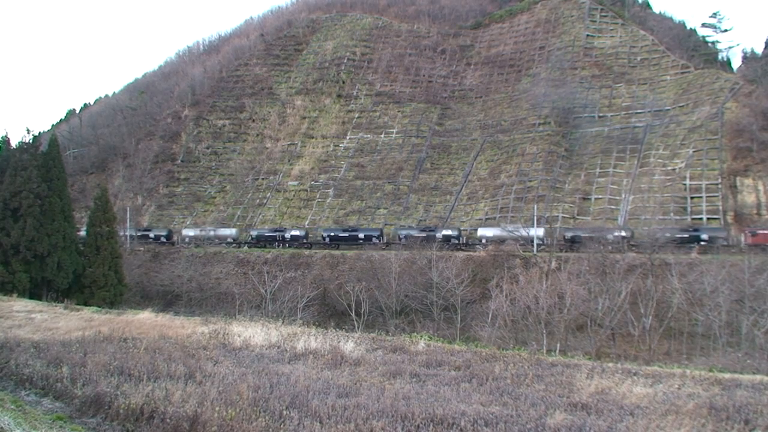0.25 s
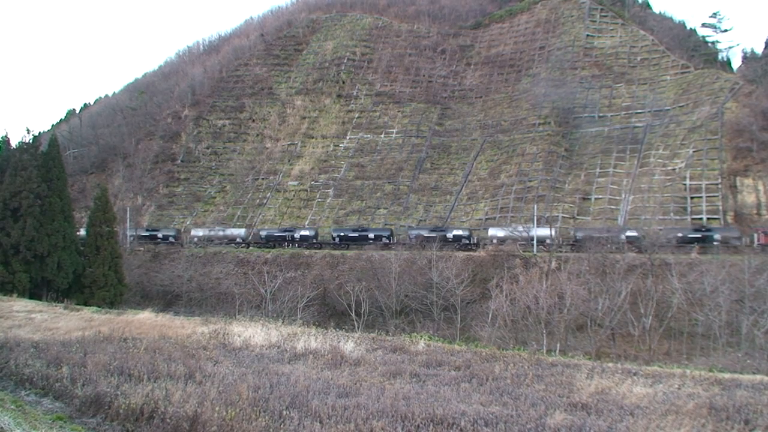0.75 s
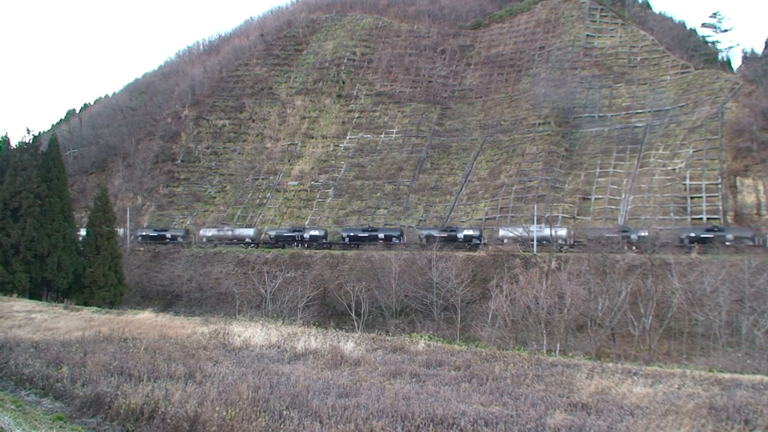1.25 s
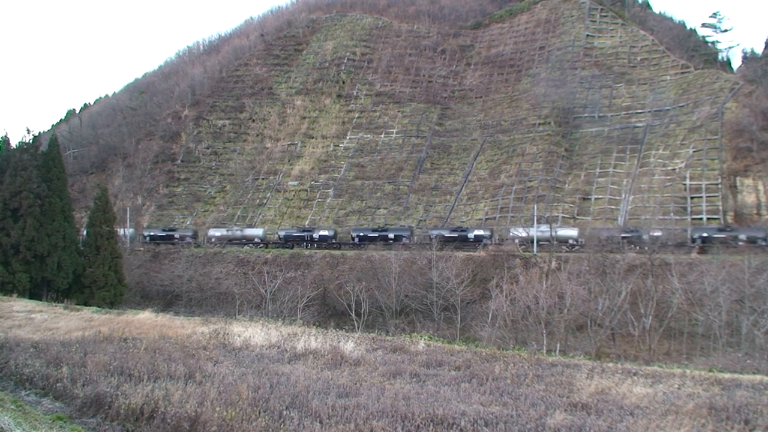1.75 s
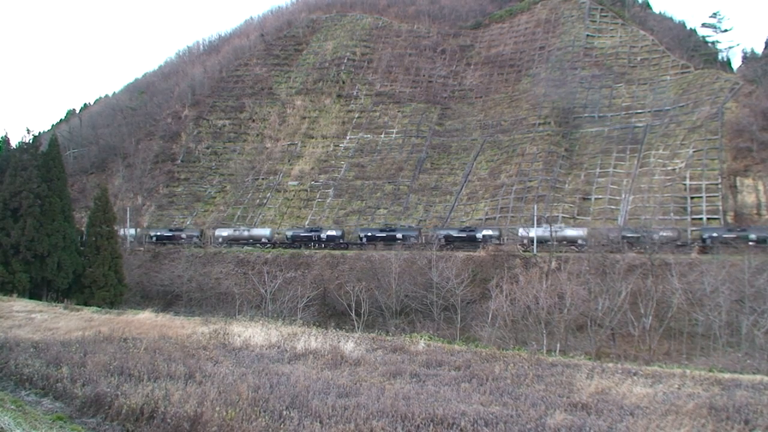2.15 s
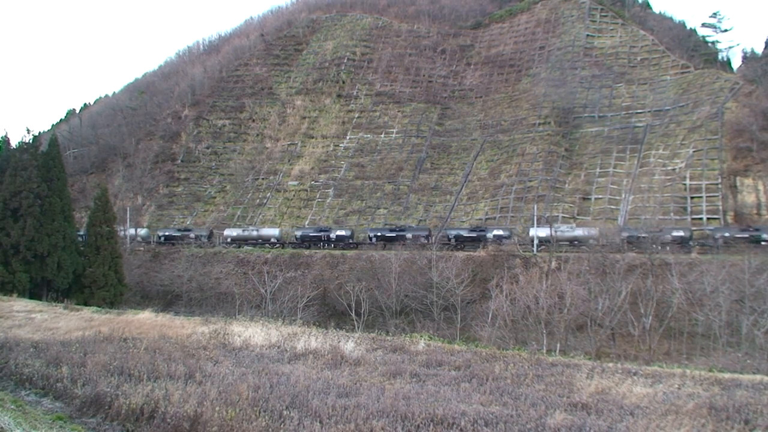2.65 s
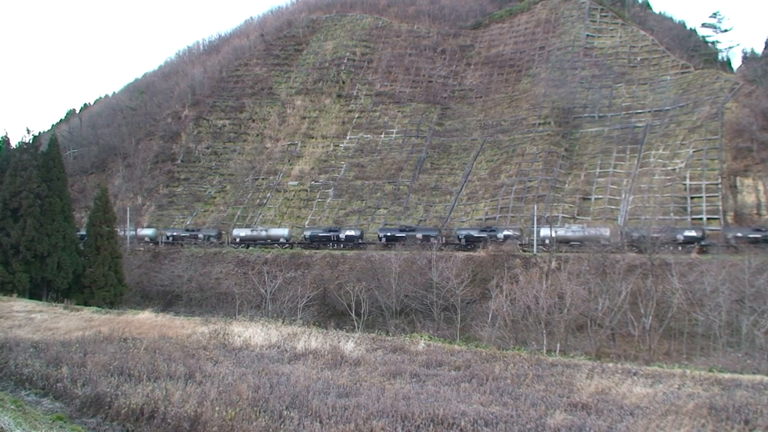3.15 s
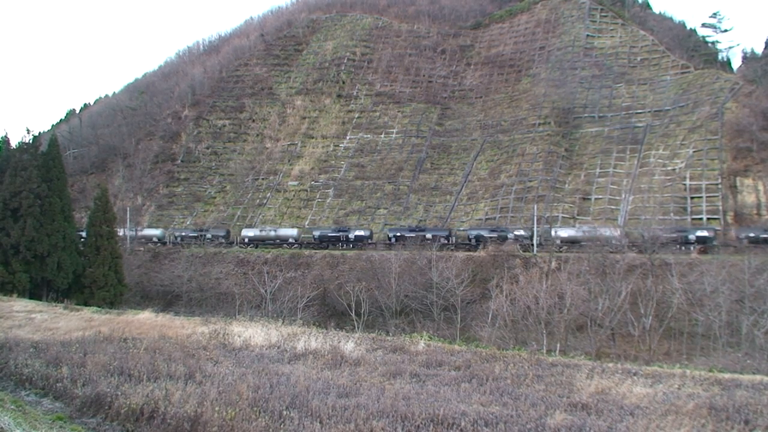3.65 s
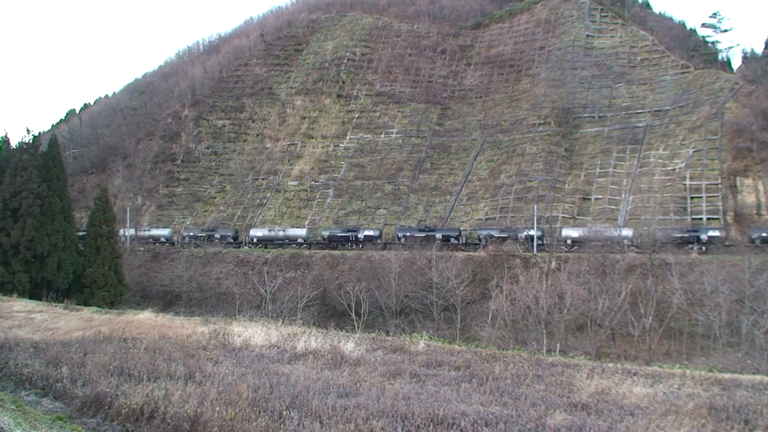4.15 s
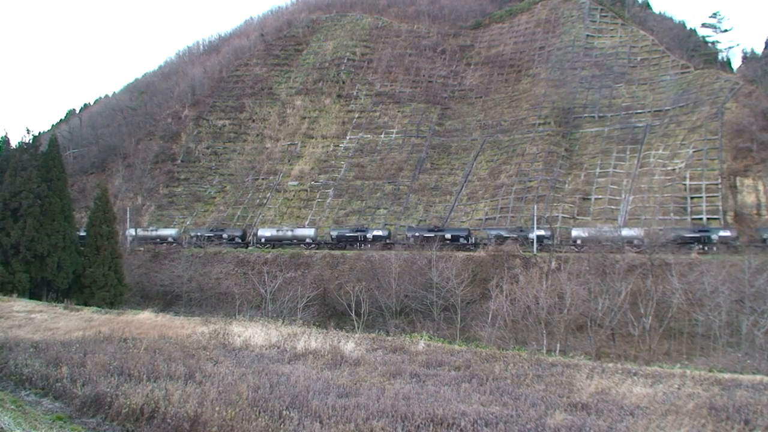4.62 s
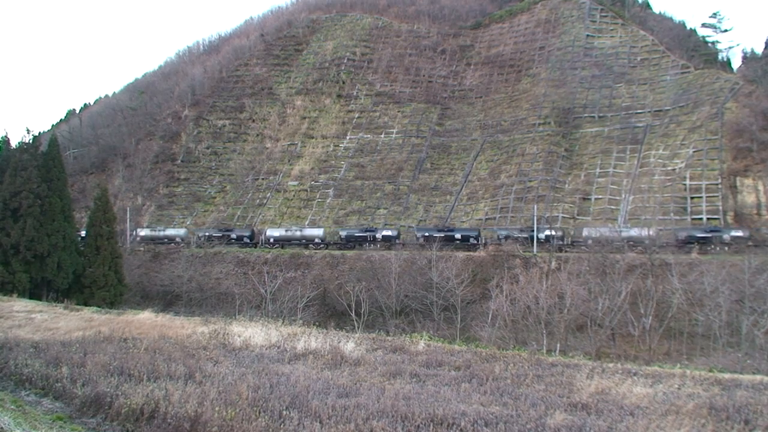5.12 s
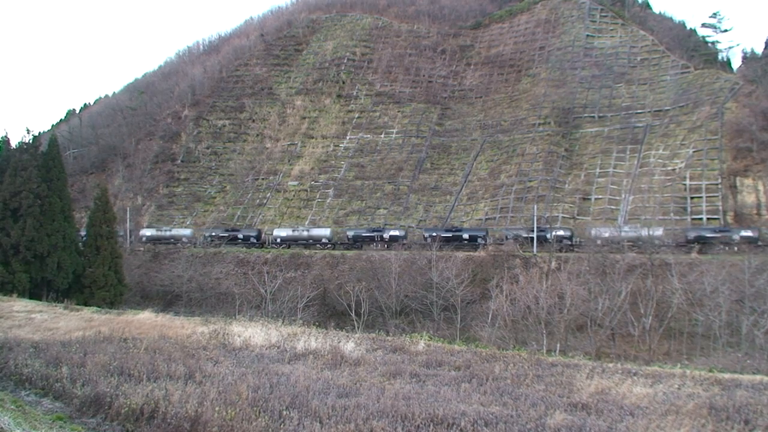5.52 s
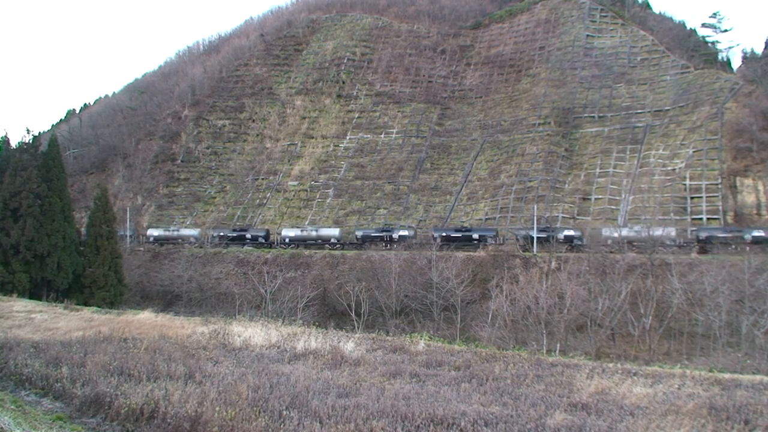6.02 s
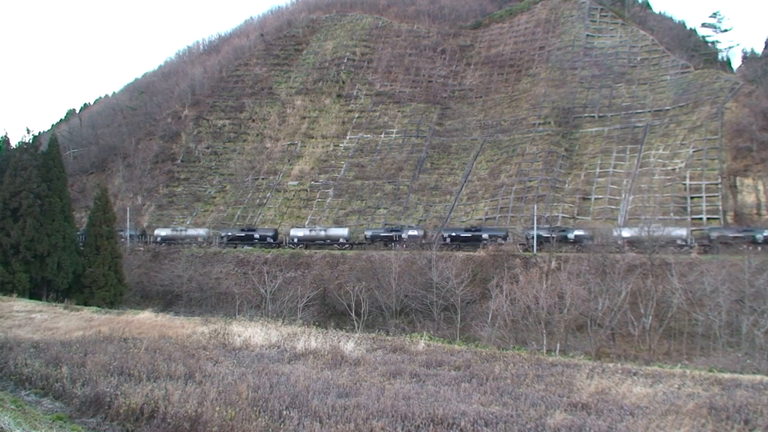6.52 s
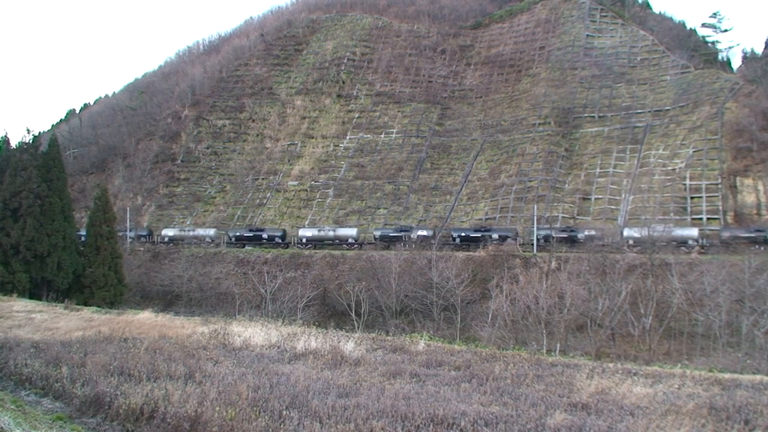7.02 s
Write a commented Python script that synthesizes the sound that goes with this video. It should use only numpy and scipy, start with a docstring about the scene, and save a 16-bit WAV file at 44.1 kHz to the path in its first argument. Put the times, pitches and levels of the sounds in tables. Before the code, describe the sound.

A slow goods train grinds along outdoors, its wheels shrieking in two long rough bursts before settling into pulsing, clattering rolling noise.

```python
"""Freight train with a squealing flange

A slow train crosses a valley. Twice a wheel flange binds hard: shaped noise scrapes, the rail sings, and the
wheel rings in filtered noise and squeals in wavering sines that ring out. Between and after, it only grazes.
Wagons grind and rumble along in coloured noise, a diesel's knock throbbing in the same band, with hard knocks,
dull thumps, low hums and a thin whine. The hillside answers the scraping with a decaying noise tail."""
import sys
import numpy as np
from scipy import signal
from scipy.fft import rfft, irfft, next_fast_len
from scipy.io import wavfile
from scipy.ndimage import uniform_filter1d, map_coordinates

SR = 44100
rng = np.random.default_rng(int(sys.argv[2]) if len(sys.argv) > 2 else 0)


def invert_db(level):
    """Linear amplitude ratio for a level in decibels (20 dB per decade), elementwise."""
    return 10 ** (np.asarray(level, dtype=float) / 20)


def dump(signal):
    """Clip the signal to [-1, 1] and save it as 16-bit WAV at the path in sys.argv[1]."""
    limited = np.clip(np.atleast_2d(signal).T, -1, 1)
    pcm = np.round(limited * 32767).astype(np.int16)
    wavfile.write(sys.argv[1], SR, pcm)


N = 321048

# Flange binding, one table a contact. Each row: time in seconds, scrape and treble levels in dB before trims.
CONTACTS = [
    [(0.0, -21, -29), (0.12, -21.5, -26), (0.23, -23.5, -28.5), (0.39, -21, -22), (0.45, -21.5, -27.5),
     (0.7, -21, -28), (0.87, -22.5, -30), (1.0, -22, -30.5), (1.1, -20, -29), (1.2, -23.5, -30.5),
     (1.378, -21, -31.5), (1.395, -27, -29)],
    [(1.665, -40, -56), (1.701, -37, -43.5), (1.761, -34, -36), (1.805, -44, -49), (1.83, -34, -46)],
    [(2.12, -40, -67), (2.154, -37, -31), (2.216, -22, -33.5), (2.37, -24, -31), (2.4, -21.5, -30.5),
     (2.712, -22.5, -29), (2.8, -25, -32.5), (3.04, -23.5, -29), (3.176, -19.5, -27.5), (3.256, -25.5, -28),
     (3.468, -19.5, -29.5), (3.492, -28, -35)],
]
# Top band against the treble in dB before trims, one value a contact.
SIZZLE_RE_TREBLE_DB = -13, -7.5, -14
# Noise colours of the scrape, its treble hiss and its top sizzle. Each row: Hz, relative density in dB.
SCRAPE_COLOUR = [(410, -49), (700, -15), (1700, -5), (2150, 5), (2500, -0.5), (3300, -4.5), (3700, -4),
                 (4600, -7.5), (5300, -12.5), (5900, -30), (7000, -39), (9100, -54), (15400, -120)]
HISS_COLOUR = [(2940, -26), (5000, 0), (5360, 6), (5920, -6), (6230, -1), (7230, -0.5), (7840, -9),
               (8530, -10), (9030, -18), (10000, -27), (13000, -37), (22000, -120)]
SIZZLE_COLOUR = [(5000, -26), (8500, -2), (8780, -8), (9520, -5), (10000, -12), (12900, -18), (14600, -30),
                 (15500, -34)]
# The rail's singing band, applied twice. Each row: centre in Hz, width in Hz, relative level in dB.
RAIL_SONG_MODES = [(2064, 73, 4.5), (2204, 63, 3), (2396, 200, -4.5)]
# Flares of the rail's song. Each row: time in seconds, peak in dB before a trim, half length in seconds.
SONG_FLARES = [(.07, -11, 0.029), (.28, -20, .04), (.45, -15, 0.13), (.63, -23, 0.033), (.77, -23, .03),
               (.84, -18, 0.016), (.92, -15, 0.015), (1.27, -21, 0.051), (2.29, -12.5, 0.032),
               (2.4, -19, 0.018), (2.46, -13.5, 0.044), (2.6, -19, .04), (2.71, -10, 0.026),
               (2.98, -12.5, 0.048), (3.05, -30, 0.018), (3.22, -14, 0.024)]
# Modes rung by the scrape, one table a wheel. Each row: Hz, relative level in dB.
WHEEL_MODES = [(2837, -39), (3015, -35), (3316, -41), (3548, -47), (4075, -31), (4355, -47), (4990, -46),
               (5163, -36), (5453, -40), (6164, -47), (6288, -37), (6842, -48), (7004, -49), (7214, -50),
               (7381, -48), (7461, -49), (7795, -53), (7978, -55), (8220, -54), (8506, -49), (9028, -59),
               (9609, -53), (10702, -54), (11020, -66), (11779, -64), (12839, -65), (13544, -65),
               (13878, -70), (14045, -71), (14739, -75)], [(2681, -41), (2885, -41), (3009, -37),
               (4037, -34), (4317, -47), (5125, -29), (5986, -53), (6212, -39), (6584, -54), (6869, -51),
               (7305, -46), (8366, -52), (8759, -62), (9227, -63), (9458, -59), (10013, -70), (10261, -65),
               (10497, -65), (11343, -71), (11574, -71), (12048, -78), (12602, -72), (13060, -79),
               (13184, -77), (13609, -81), (14018, -79), (14562, -83), (14702, -85), (15305, -91)]
# Brief grazes of the flange. Each row: time in seconds, strength in dB, low part and top part in dB against
# that strength (all before trims and onset), t60 of the grit in seconds.
GRAZE_EVENTS = [(1.563, -34, -6, -30, 0.05), (1.6685, -33, 1, -23, 0.071), (1.7374, -32, -10, -22, 0.058),
                (1.812, -32, 9, -11, 0.058), (1.8835, -42, 16, -10, 0.099), (1.96, -34, -8, -11, 0.037),
                (1.9663, -23.5, 8, -16.5, 0.13), (2.08, -29.5, 4, -25, 0.044), (2.128, -23, -11, -27, 0.05),
                (2.15, -22.5, -17, -34, 0.096), (2.1904, -23, 5, -20, 0.044),
                (3.713, -29.5, 6.5, -15, 0.064), (5.335, -41, -4, -24, 0.063), (5.441, -39, 10, -20, 0.063),
                (5.6545, -32, 1, -28, 0.041), (5.8605, -34.5, 11, -21, 0.082), (6.011, -35, -2, -18, 0.056),
                (6.1891, -38.5, 14.5, -18, 0.071), (6.3225, -39.5, -9, -15, 0.058)]
# Noise colour of a graze's treble. Each row: Hz, relative density in dB.
GRAZE_COLOUR = [(4000, 1), (5500, 8), (7000, 2.5), (9000, -9.5), (11000, -30), (15500, -55)]
# Squeal tones, one table a wheel. Each row: Hz, dB against the scrape while bound, dB against a graze's strength.
SQUEALS = [
    [(1126, -19.5, -30), (2837, -21, -30), (3015, -22, -30), (3317, -20.5, -30), (4075, -18.5, -30),
     (4126, -12, -30), (5165, -21, -30), (5454, -29, -30), (6287, -26.5, -30), (8500, -27, -40),
     (9608, -30, -38), (10701, -34, -45), (11779, -41, -51), (12839, -44, -52), (13544, -48, -50),
     (14739, -48, -55)],
    [(2885, -33, -26), (3008, -20, -22), (4037, -14, -34), (4157, -27, -19), (5125, -16.5, -15),
     (6211, -23, -39), (7300, -31, -37), (8366, -35, -44), (9330, -31, -39), (10520, -35, -44),
     (11500, -43, -50), (12601, -45, -48), (13609, -49, -48), (14702, -52, -52)],
]
# Moments when one tone takes over. Each row: time in seconds, Hz, peak in dB, half length in seconds.
SQUEAL_SWELLS = [(0.0, 5165, -30, 0.022), (0.017, 3015, -31, 0.067), (.058, 2837, -35, 0.01),
                 (.085, 1126, -31.5, 0.033), (0.098, 4075, -24, 0.013), (.104, 9608, -46, 0.028),
                 (0.126, 5165, -28, 0.017), (0.133, 6287, -29, 0.067), (0.154, 4075, -30, 0.011),
                 (0.182, 1126, -29.5, 0.025), (0.192, 5165, -24.5, .025), (0.23, 4075, -25, 0.068),
                 (0.27, 3015, -30, 0.029), (0.29, 10701, -47, 0.033), (.356, 2837, -35, 0.018),
                 (0.375, 8500, -40, 0.057), (0.404, 3015, -25, 0.022), (0.427, 6287, -33, .03),
                 (0.433, 1126, -35, 0.042), (.548, 9608, -52, 0.043), (0.615, 4075, -37, 0.042),
                 (0.626, 1126, -45, 0.091), (.638, 2837, -43, 0.036), (0.643, 5165, -39, .06),
                 (0.67, 3317, -33, 0.02), (.766, 3015, -38, .05), (.79, 4075, -24.5, 0.035),
                 (.904, 8500, -40.5, 0.13), (0.915, 5454, -32, 0.036), (0.92, 6287, -37, 0.046),
                 (0.935, 4075, -28.5, 0.026), (1.026, 5165, -33.5, .06), (1.06, 3317, -39, .05),
                 (1.2, 3317, -32.5, 0.096), (1.256, 9608, -53, .04), (1.274, 4075, -36, 0.026),
                 (1.3, 5454, -37, 0.035), (1.342, 2837, -35, 0.016), (1.37, 8500, -49, 0.063),
                 (1.75, 5125, -37, 0.032), (2.243, 4037, -32, 0.023), (2.312, 3008, -25, 0.02),
                 (2.338, 5125, -19.5, 0.062), (2.395, 3008, -22, 0.011), (2.437, 2885, -31, 0.045),
                 (2.496, 4037, -47, 0.054), (2.5, 4157, -37, 0.067), (2.55, 6211, -37, 0.17),
                 (2.592, 5125, -37, 0.054), (2.653, 4037, -28, 0.01), (2.647, 6211, -37, .03),
                 (2.704, 3008, -26, .025), (2.714, 2885, -38, 0.034), (2.776, 4037, -27, 0.057),
                 (2.91, 5125, -30, .04), (2.987, 8366, -43, 0.047), (3.045, 4037, -46, 0.02),
                 (3.062, 4157, -36, 0.056), (3.095, 2885, -32, 0.025), (3.13, 5125, -40, 0.033),
                 (3.19, 4157, -29, 0.044), (3.19, 7300, -41, 0.089), (3.204, 4037, -29, 0.013),
                 (3.29, 4037, -29, 0.026), (3.286, 6211, -35, 0.025), (3.29, 5125, -36, 0.021),
                 (3.383, 8366, -38.5, 0.089), (3.424, 4037, -38, 0.032), (3.464, 7300, -35, 0.045),
                 (3.49, 6211, -34.5, 0.042), (3.47, 12601, -58, .06), (3.47, 14702, -68, .06),
                 (.4, 13544, -54, .05), (3.607, 2885, -33.5, 0.016)]
# Steady rolling. Each row: time in seconds, grind level and rumble level in dB, before fluctuation and rattle.
ROLLING_LEVELS = [(0, -27.5, -53.5), (.8, -26.5, -48.5), (1.1, -26.5, -51), (1.3, -25, -44.5),
                  (1.5, -27, -47), (2, -27, -53), (2.8, -26, -51.5), (3.6, -27.5, -54.5),
                  (4.2, -27.5, -54.5), (4.8, -28, -54.5), (5.4, -28, -50.5), (6, -28.5, -54),
                  (6.6, -29, -53.5), (7.28, -29.5, -55.5)]
# Noise colours of the grind and the rumble. Each row: Hz, relative density in dB.
GRIND_COLOUR = [(120, -60), (200, -26.5), (332, -8.5), (366, -8.5), (418, -6.5), (461, -7.5), (619, -2),
                (873, -7), (1120, -9.5), (1760, -9), (2150, -2), (2570, -13), (4340, -16.5), (4950, -24),
                (10000, -46.5), (13000, -86), (22000, -120)]
RUMBLE_COLOUR = [(15, -73), (25, -43), (45, -25.5), (106, -18), (151, -15), (178, -12.5), (300, -7),
                 (390, -8), (660, -120)]
# Rail and wagon resonances lifting the grind. Each row: centre in Hz, width in Hz, strength in dB.
TRACK_MODES = [(1172, 264, 5), (2143, 157, 3.5), (2780, 400, 0)]
# The hardest knocks. Each row: time in seconds, strength in dB before a trim and the onset.
KNOCK_EVENTS = [(0.0528, -7), (0.1136, -11), (0.179, -6), (0.4723, 1), (0.613, -25), (0.7692, -2),
                (0.8999, -12), (1.0969, 1), (1.2695, -3), (1.3184, -12), (1.6392, -12), (1.9121, -2.5),
                (1.9565, -2), (2.2852, -4), (2.3979, -8), (2.4478, -3), (2.7077, 0), (2.8105, -7),
                (2.9073, -2), (3.1577, -9), (3.8806, -7), (3.9679, -9), (6.1524, -8), (6.1908, -14),
                (6.2402, -9.5), (6.4647, -7), (6.779, -10), (7.001, -11)]
# Dull low thumps, some like wind buffets, the later ones under grazes. Each row: time in seconds, strength in
# dB before the onset, Hz, t60 in seconds.
THUMP_EVENTS = [(1.079, -37, 109, 0.12), (1.131, -40, 99, 0.13), (1.31, -36, 111, 0.16),
                (1.33, -31.5, 186, 0.11), (1.521, -42, 201, 0.15), (3.71, -38, 304, 0.12),
                (5.44, -37, 283, 0.1), (6.19, -34, 265, 0.09), (6.331, -33, 286, .1)]
# Low wheel hums. Each row: start and length in seconds, first and last pitch in Hz, level in dB before wander.
WHEEL_HUMS = [(1.255, 1.85, 438, 450, -50.5), (4.648, 2.2, 424, 427, -49.5)]
# Growth added to the hums. Each row: time in seconds, peak in dB, half length in seconds.
HUM_GROWTH = [(1.78, -50, 0.055), (2.45, -46, .1), (2.97, -45, 0.055), (4.77, -49, 0.034), (5.05, -45, 0.1),
              (5.35, -44, 0.13), (5.65, -48, 0.037)]
# Flickers of a faint thin whine. Each row: time in seconds, peak in dB, half length in seconds.
WHINE_FLICKERS = [(5.31, -77, .07), (5.67, -65, .02), (6.03, -72, .08), (6.192, -63, 0.013),
                  (6.33, -62, .015)]
# The slope's reverberation. Each row: Hz, t60 in seconds.
HILL_DECAY = [(300, 0.89), (2000, 0.84), (6000, 0.72), (14000, 0.45)]

KNOCK_HZ, KNOCK_START_S = 22.41, .031
SECOND_WHEEL_S = 1.64  # from here the second wheel is the one touching
SLIP_DB, SURGE_DB = .8, .4  # chance swing of each band alone, and slow swing of all together
PLATES_DB, SONG_DB = -3.5, -12  # plates and rail song against the scrape curve
RING_OUT_DB_PER_S, RING_OUT_PER_KHZ = 45, 7  # squeal decay once let go, faster for high tones
WANDER_DB, AFTER_SWELL_DB = 3.5, -12  # chance swing of a held tone; what a swell leaves ringing
FLUTTER, SQUEAL_BLUR_HZ = .4, 8  # squeal wavering in gain (a ratio) and in pitch
HUM_FADE_S = 0.075


def unit(x):
    """Scaled to rms 1."""
    return x / np.sqrt(np.mean(x ** 2) + 1e-20)


def along(points, hz):
    """(Hz, value) points read on a log frequency axis."""
    f, v = np.transpose(points)
    return np.interp(np.log(hz + 1), np.log(f + 1), v)


def curves(rows, silent=-120):
    """One value per sample for each column after the time; silence outside the table."""
    s, *cols = np.transpose(rows)
    t = np.arange(N) / SR
    return np.array([np.interp(t, s, c, silent, silent) for c in cols])


def wobble(rate):
    """A smooth random curve, rate knots a second."""
    k = np.arange(0, N + 16, 16)
    knots = rng.standard_normal(int(N * rate / SR) + 4)
    return np.interp(np.arange(N), k, map_coordinates(knots, [k * rate / SR]))


def faded(db):
    """Gain of a level curve, its steps rounded over a few milliseconds."""
    return uniform_filter1d(invert_db(db), size=300, axis=-1)


def swells(rows):
    """Summed gain of peaked swells, each 6 dB down one half length either side of its peak."""
    out = np.zeros(N)
    for s, db, half_s in rows:
        first = max(0, round((s - 5 * half_s) * SR))
        last = min(N, round((s + 5 * half_s) * SR))
        k = np.arange(first, last)
        out[k] += invert_db(db - 6 * np.abs((k / SR - s) / half_s) ** 1.4)
    return out


def filtered(x, response):
    """x times a complex response of frequency."""
    m = next_fast_len(N + SR)
    return irfft(rfft(x, m) * response(np.fft.rfftfreq(m, 1 / SR)), m)[..., :N]


def resonances(f, modes):
    """Causal response of (Hz, width, dB) modes, added with alternating sign."""
    return sum((-1) ** k * invert_db(db) * 1j * f * w / (c * c - f * f + 1j * f * w)
               for k, (c, w, db) in enumerate(modes))


def noise(patchy_db, size=512):
    """White noise with patches of random gain; long frames give narrow, lasting streaks."""
    z = signal.stft(rng.standard_normal(N + size), nperseg=size)[2]
    field = uniform_filter1d(rng.standard_normal(z.shape), size=3, axis=0)
    field = uniform_filter1d(field, size=5, axis=1)
    return signal.istft(z * invert_db(patchy_db * unit(field)), nperseg=size)[1][:N]


def coloured(x, spectrum):
    """x through a (Hz, dB) spectrum, rms 1."""
    return unit(filtered(x, lambda f: invert_db(along(spectrum, f))))


def tone(hz, blur_hz):
    """A sine of rms 1 whose pitch wavers."""
    cycles = np.cumsum(hz + blur_hz * wobble(29.92)) / SR
    return np.sqrt(2) * np.sin(2 * np.pi * cycles + rng.uniform(0, 2 * np.pi))


def flecks(rate, centre_hz, spread, life_s, size_db):
    """Short tones at scattered times and pitches, rate a second on average, rms 1."""
    u = rng.uniform(size=(int(rate * N / SR), 3))
    z = rng.standard_normal((len(u), 2))
    k = np.arange(int(3 * life_s * SR))
    age = k / SR / (life_s * np.exp(0.19 * z[:, :1]))
    hz = centre_hz * np.exp(spread * z[:, 1:])
    size = invert_db(-size_db * np.log(u[:, 1:2]))  # a few are much larger than the rest
    grain = size * age * np.exp(-2 * age) * np.sin(2 * np.pi * (hz * k / SR + u[:, 2:]))
    where = (u[:, :1] * N).astype(int) + k
    return unit(np.bincount(where.ravel(), grain.ravel(), N + len(k))[:N])


def flange():
    """Stick-slip grit: scrape, hiss and rail song follow the binding; the same force rings the wheel."""
    scrape_db, treble_db = np.max([curves(c) for c in CONTACTS], axis=0)
    sizzle_db = np.max([curves(c)[1] + db for c, db in zip(CONTACTS, SIZZLE_RE_TREBLE_DB)], axis=0)
    scrape_db = scrape_db + SLIP_DB * wobble(25.09)
    hiss_db = treble_db + SLIP_DB * wobble(25.57)
    sizzle_db = sizzle_db + SLIP_DB * wobble(24.7)
    grit = invert_db(SURGE_DB * wobble(26) + 1.44 * wobble(60))  # uneven slips shake the bands together
    treble, low, top = grazes()

    scrape = (faded(scrape_db - 3.0) * grit + low) * coloured(noise(patchy_db=3.5, size=2048), SCRAPE_COLOUR)
    plates = flecks(rate=220, centre_hz=2760, spread=.16, life_s=0.018, size_db=2.5)
    scrape += faded(scrape_db + PLATES_DB) * plates  # plates ring up briefly
    hiss = faded(hiss_db + 0.75) * grit * coloured(noise(patchy_db=5.0, size=2048), HISS_COLOUR)
    sizzle = (faded(sizzle_db + 0.5) * grit + top) * coloured(noise(patchy_db=0.0, size=2048), SIZZLE_COLOUR)
    song_gain = faded(scrape_db + SONG_DB + 2.1 * wobble(24)) + invert_db(-7.0) * swells(SONG_FLARES)
    singing = filtered(noise(patchy_db=6.5, size=2048), lambda f: resonances(f, RAIL_SONG_MODES) ** 2)
    song = song_gain * unit(singing)

    force = invert_db(scrape_db + 20) * grit + invert_db(26.0) * treble
    graze_treble = treble * coloured(rng.standard_normal(N), GRAZE_COLOUR)
    return scrape + hiss + sizzle + song + wheel_ring(force) + graze_treble


def grazes():
    """Each graze is a puff of grit with a sudden start: (treble, low part, top part) excitation."""
    out, t = np.zeros((3, N + SR)), np.arange(SR // 4) / SR
    for s, db, low_db, top_db, t60 in GRAZE_EVENTS:
        crack = invert_db(db - 6.0 - 60 * t / 0.006)
        grit = invert_db(db - 60 * t / max(t60, .01))
        puff = (crack + grit) * (1 - np.exp(-t / 0.00047))
        out[:, round(s * SR):][:, :len(t)] += puff * invert_db([[-3], [low_db - 3], [top_db + 2]])
    return out[:, :N]


def wheel_ring(force):
    """Noisy contact force rings the many modes of whichever wheel is touching."""
    second = np.arange(N) / SR > SECOND_WHEEL_S
    squeal_hz = np.concatenate(SQUEALS)[:, 0]
    ring = 0
    for wheel, touching in zip(WHEEL_MODES, (~second, second)):
        modes = []
        for hz, db in wheel:
            locked = np.min(np.abs(squeal_hz - hz)) < 30  # locked modes give their energy to the squeal
            modes.append((hz, 6 + hz / 2500, db - 12 * locked + 0.3 * hz / 1000))
        struck = force * touching * noise(patchy_db=0.5)
        ring = ring + invert_db(28.5) * filtered(struck, lambda f: resonances(f, modes) * (f > 1500))
    return ring


def squeal():
    """A few modes lock into near-pure tones while the flange binds, swell in turn and ring out."""
    step = 32  # samples between points of the level curves
    t, out = np.arange(0, N, step) / SR, 0
    scrape_db = np.max([curves(c)[0] for c in CONTACTS], axis=0)[::step]
    graze_db = np.full(len(t), -120.)
    graze_db[[round(g[0] * SR / step) for g in GRAZE_EVENTS]] = [g[1] for g in GRAZE_EVENTS]
    for wheel, touching in zip(SQUEALS, (t <= SECOND_WHEEL_S, t > SECOND_WHEEL_S)):
        own_swells = {row[0]: [] for row in wheel}
        for s, f, db, half_s in SQUEAL_SWELLS:
            if touching[round(s * SR / step)]:
                nearest_hz = min(wheel, key=lambda row: abs(row[0] - f))[0]
                own_swells[nearest_hz].append((s, db, half_s))
        for hz, bound_db, kicked_db in wheel:
            peaks = swells(own_swells[hz])[::step]
            driven = np.maximum(scrape_db + bound_db, graze_db + kicked_db)
            driven = np.where(touching, driven, -120)
            driven = np.maximum(driven, 20 * np.log10(peaks + 1e-6) + AFTER_SWELL_DB)
            # the level jumps up with the drive but can only fall at the ring-out speed
            fading = (RING_OUT_DB_PER_S + RING_OUT_PER_KHZ * hz / 1000) * t
            held_db = np.maximum.accumulate(driven + fading) - fading
            held = invert_db(held_db + WANDER_DB * wobble(23.98)[::step])
            gain = np.interp(np.arange(N) / SR, t, uniform_filter1d(held, size=22) + peaks)
            out = out + gain * (1 + FLUTTER * wobble(60)) * tone(hz, blur_hz=SQUEAL_BLUR_HZ)
    return out


def rolling():
    """Rough wheels on rough rail; every diesel knock kicks the upper band and fades through its cycle."""
    grind_db, rumble_db = curves(ROLLING_LEVELS)
    beats = (np.arange(N) / SR - KNOCK_START_S) * KNOCK_HZ
    phase = beats % 1
    strength = invert_db(rng.uniform(-5.5, 2.6, int(beats[-1]) + 2))[np.floor(beats).astype(int) + 1]
    knock = strength * (1 - np.exp(-phase / 0.14)) * np.exp(-phase / 0.54)

    upper_gain = [(800, 0.031), (1300, 0.27), (2100, 0.99), (3000, 1.34), (5500, 1.26), (7500, 0.038)]
    kicked = knock * invert_db(1.05 * wobble(350)) * noise(patchy_db=3.0, size=256)
    upper = filtered(kicked, lambda f: along(upper_gain, f))
    drive = noise(patchy_db=1.5, size=1024) * invert_db(0.27 * wobble(6)) + invert_db(6.5) * upper
    grind = coloured(filtered(drive, lambda f: 1 + np.abs(resonances(f, TRACK_MODES)) ** 2), GRIND_COLOUR)
    rattle = flecks(rate=500, centre_hz=3410, spread=0.087, life_s=0.0046, size_db=1.4)
    grind += invert_db(-19) * (0.44 + knock) * rattle  # loose parts
    pings = flecks(rate=90, centre_hz=2150, spread=0.029, life_s=.008, size_db=2.5)
    grind += invert_db(-11.5) * knock * pings  # from the rail

    rumble = coloured(noise(patchy_db=1.5), RUMBLE_COLOUR)
    return invert_db(grind_db) * grind + invert_db(rumble_db + 1.4 * wobble(8)) * rumble


def blows():
    """Hard knocks ring the rail's band briefly; thumps are short, low decaying tones."""
    out, t = np.zeros(N + SR), np.arange(SR // 4) / SR
    chance = rng.standard_normal((len(KNOCK_EVENTS), 2))
    for (s, db), (a, b) in zip(KNOCK_EVENTS, chance):
        ring = np.sin(2 * np.pi * (2150 + 50 * a) * t) + 0.4 * np.sin(2 * np.pi * (2260 + 80 * b) * t)
        decay = invert_db(db - 6.5 - 60 * t / 0.047)
        out[round(s * SR):][:len(t)] += decay * (1 - np.exp(-t / 0.0021)) * ring
    for s, db, hz, t60 in THUMP_EVENTS:
        decay = invert_db(db - 60 * t / t60)
        out[round(s * SR):][:len(t)] += decay * (1 - np.exp(-t / 0.0046)) * np.sin(2 * np.pi * hz * t)
    return out[:N]


def faint_tones():
    """Low hums and a thin, fuzzy whine from wheels further along."""
    t, grown, hums = np.arange(N) / SR, swells(HUM_GROWTH), 0
    for s, length, first_hz, last_hz, db in WHEEL_HUMS:
        fade = np.clip(np.minimum(t - s, s + length - t) / HUM_FADE_S + .5, 0, 1)
        glide_hz = np.interp(t, [s, s + length], [first_hz, last_hz])
        hums = hums + (invert_db(db + 2.5 * wobble(8)) + grown) * fade * tone(glide_hz, blur_hz=0.99)
    whine = unit(filtered(rng.standard_normal(N), lambda f: resonances(f, [(8200, 300, 0)]) ** 2))
    return hums + (swells(WHINE_FLICKERS) + invert_db(-74)) * whine


def hillside(x):
    """Each frequency of the slope's answer dies at its own speed."""
    hz, t, z = signal.stft(rng.standard_normal(SR // 2), SR, nperseg=256)
    decay = invert_db(-60 * t / along(HILL_DECAY, hz)[:, None])
    tail = signal.istft(z * decay, SR, nperseg=256)[1]
    late = np.pad(x, (600, 0))  # samples of delay
    return signal.fftconvolve(late, tail / np.linalg.norm(tail))[:N]


def scene():
    """Train and hillside; the scraping is thinned below 300 Hz."""
    scraping = filtered(flange(), lambda f: f ** 2 / (f ** 2 + 300 ** 2))
    answer = invert_db(-9) * hillside(scraping)
    return (scraping + answer + squeal() + rolling() + blows() + faint_tones())[None]


def microphone_hiss():
    """Steady microphone noise, thin in the bass."""
    colour = [(30, -18), (300, -9), (6000, 1.5), (16000, -3)]  # Hz, relative dB
    return invert_db(-64.5) * coloured(rng.standard_normal(N), colour)


def low_pass(x):
    """Removes everything above the highest recorded frequency."""
    return signal.sosfilt(signal.butter(12, 15650, fs=SR, output="sos"), x)


def record(dry):
    """The scene with microphone hiss added."""
    mix = dry + microphone_hiss()
    return low_pass(mix)


dry = scene()
out = record(dry)
dump(out)
```